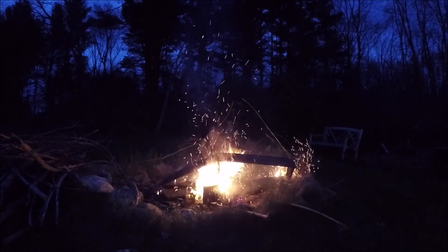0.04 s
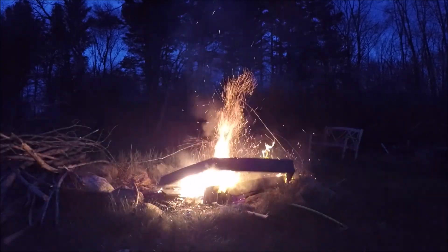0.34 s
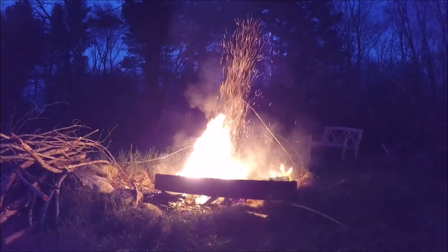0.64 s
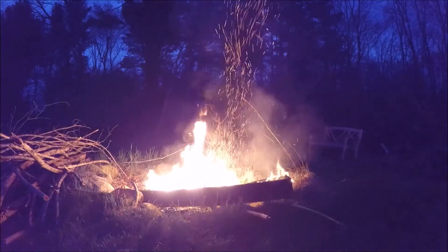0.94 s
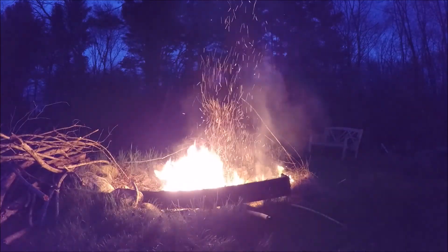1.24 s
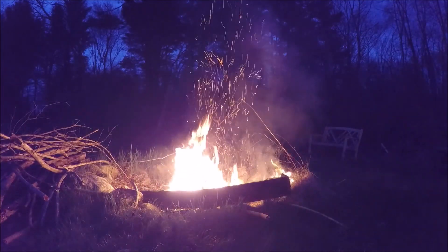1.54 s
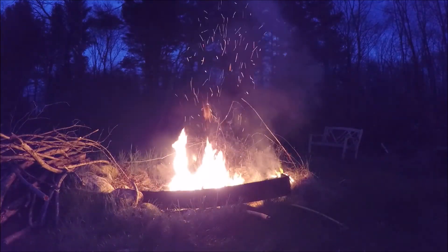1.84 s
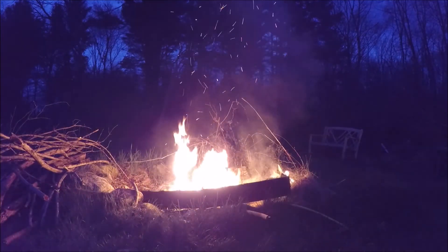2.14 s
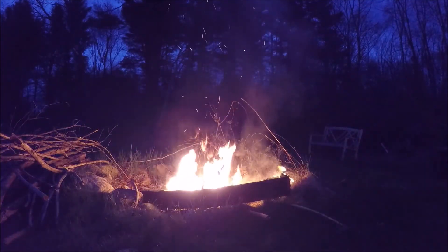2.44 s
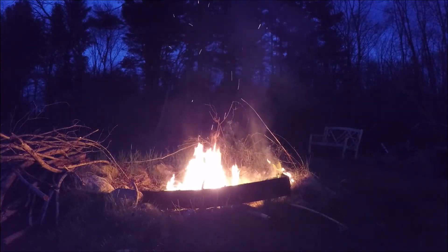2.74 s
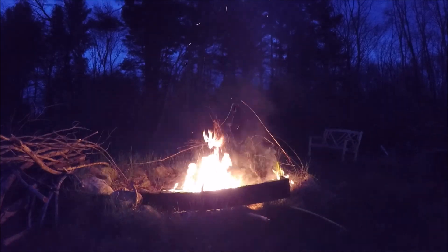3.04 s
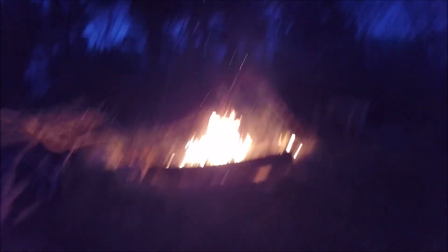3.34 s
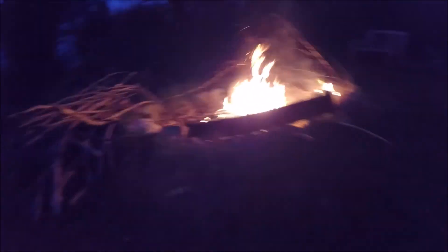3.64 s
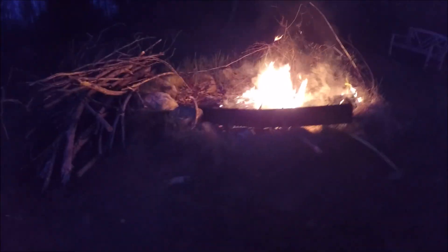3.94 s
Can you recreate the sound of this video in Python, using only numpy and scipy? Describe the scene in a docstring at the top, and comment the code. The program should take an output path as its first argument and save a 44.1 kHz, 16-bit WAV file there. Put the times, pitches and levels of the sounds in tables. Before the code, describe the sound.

A bonfire sizzles, snaps and pops as logs settle, then eases to a soft flutter. Small frogs peep faintly in the distant woods. Near the end, fingers knock and rub loudly on the hand-held microphone.

```python
"""Bonfire at dusk, frogs beyond

At the fireside, just after a log has been dropped on: stirred embers sizzle, wood snaps, pockets of
gas catch, and the flames throb, flutter and settle. Far off in the woods a chorus of small frogs peeps.
In the last second, right at the microphones, fingers knock and slide on the hand-held recorder."""
import sys
import numpy as np
from scipy import signal
from scipy.fft import rfft, irfft
from scipy.io import wavfile
from scipy.ndimage import uniform_filter1d, map_coordinates

SR = 44100
rng = np.random.default_rng(int(sys.argv[2]) if len(sys.argv) > 2 else 0)


def wav_out(sig):
    """Save sig, one row per channel (or a flat mono array), as 16-bit PCM at SR to the path in sys.argv[1]."""
    wavfile.write(sys.argv[1], SR, np.round(np.clip(np.atleast_2d(sig).T, -1, 1) * 32767).astype(np.int16))


N = 176400
T = np.arange(N) / SR
EMBERS_PER_S, EMBER_SPREAD_DB, EMBER_SIDE_DB = 2200, 2, -8.5
SOFT_RISE_S = 0.0027
# spectrum of a dry tick, in wood or on the recorder's case (frequency [Hz], level [dB])
DRY_TICK_SPECTRUM = [(300, -12), (900, 3), (2200, 7), (4500, 1), (8000, -18)]


def undb(db):
    """Decibels to gain."""
    return 10 ** (np.asarray(db) / 20)


def unit(x):
    """Scale to rms 1."""
    return x / np.sqrt(np.mean(x ** 2))


def curve(rows):
    """Gain through points of (time [s], level [dB])."""
    return undb(np.interp(T, *np.array(rows).T))


def colour(x, points):
    """Filter x by points of (frequency [Hz], level [dB]), rolling off beyond them; rms 1."""
    hz, db = np.array(points).T
    log_f = np.log(np.maximum(np.arange(N // 2 + 1) * SR / N, 1))
    outside = np.maximum(np.log(hz[0]) - log_f, 0) + np.maximum(log_f - np.log(hz[-1]), 0)
    gain = undb(np.interp(log_f, np.log(hz), db) - 20 * outside)
    return unit(irfft(rfft(x) * gain, N))


def noise():
    """White noise."""
    return rng.standard_normal(N)


def walk(per_s):
    """Smooth random wander, rms 1."""
    hold = int(SR / per_s)
    steps = np.repeat(noise()[:N // hold + 1], hold)
    return unit(uniform_filter1d(uniform_filter1d(steps, hold), hold)[:N])


def crackle(per_s, spread_db, spectrum):
    """Two unrelated streams of tiny filtered impulses; spread_db makes their sizes uneven."""
    streams = []
    for _ in range(2):
        size = undb(spread_db * np.minimum(rng.exponential(size=N), 5))
        impulses = (rng.random(N) < per_s / SR) * size * np.sign(noise())
        streams.append(colour(impulses, spectrum))
    return np.array(streams)


def noise_pair(spectrum):
    """Two unrelated noises of one spectrum."""
    return np.array([colour(noise(), spectrum) for _ in range(2)])


def wide(pair, side_db):
    """Left and right from a mid and side pair."""
    mid, side = pair
    return mid + undb(side_db) * side * np.array([[1], [-1]])


def pan(db):
    """Gains of constant total power, left over right by db."""
    return unit(undb(np.array([[db], [-db]]) / 2))


def burst(at, rise, fade):
    """A quick rise and an exponential fade."""
    return np.clip((T - at) / rise + 1, 0, 1) * np.exp(-np.maximum(T - at, 0) / fade)


def bump(at, half):
    """A smooth swell around one moment."""
    return np.exp(-((T - at) / half) ** 2)


def push_pull(at, half):
    """One smooth push followed by a pull, peak 1."""
    u = (T - at) / half
    return -np.sqrt(2 * np.e) * u * np.exp(-u ** 2)


def flames():
    """Turbulent burning: a flutter of tiny ignitions, nearly centred between the microphones."""
    # roar of the flames (time [s], level [dB])
    levels = [(0, -39), (.17, -34.5), (.35, -38), (.55, -38.5), (.82, -41), (1.1, -39), (1.24, -39),
              (1.32, -39), (1.45, -37), (1.65, -42.5), (1.87, -36.5), (1.97, -41), (2.2, -44.5),
              (2.47, -43.5), (2.77, -47), (2.87, -42.5), (4, -49)]
    # its spectrum (frequency [Hz], level [dB])
    spectrum = [(20, -36), (60, -13), (105, -9), (135, -0.5), (175, 1.5), (300, -7), (420, -4.5), (820, -8),
                (1150, -16), (2000, -28), (3000, -39), (4500, -54), (9000, -71)]
    ignitions = crackle(per_s=1500, spread_db=0, spectrum=spectrum)
    flutter = undb(1.5 * walk(44.8))
    return wide(ignitions, side_db=-18.5) * curve(levels) * flutter


def throbs(pitch_hz=68.6, waver=0.064, fall_over_rise=1.65):
    """In short spells the flame pulsates at a low, wavering pitch, a little to the left."""
    # spells of throbbing (peak time [s], rise [s], level [dB])
    spells = [(.005, 0.028, -27.5), (0.111, 0.022, -35), (0.211, 0.015, -27), (.324, 0.031, -33),
              (0.605, .028, -29), (0.695, 0.014, -26.5), (0.764, 0.024, -37.5), (.926, 0.028, -21.5),
              (1.048, 0.032, -21), (1.109, 0.026, -30)]
    cycles = np.cumsum(pitch_hz * (1 + waver * walk(38.96))) / SR
    pulsing = 0
    for at, rise, db in spells:
        swell = bump(at, np.where(T < at, rise, fall_over_rise * rise))
        pulsing += undb(db) * swell * np.cos(2 * np.pi * (cycles - np.interp(at, T, cycles)))
    roughness = undb(2.9 * walk(60.7))
    return np.sqrt(2) * pulsing * roughness * pan(3.5)


def draught():
    """The fire's draught rumbles and dies down."""
    # rumble of the draught (time [s], level [dB])
    levels = [(0, -40.5), (.25, -44), (.48, -42.5), (.75, -44.5), (1.1, -44), (1.4, -45), (1.8, -50.5),
              (2.2, -56.5), (2.8, -55.5), (4, -74)]
    # its spectrum (frequency [Hz], level [dB])
    spectrum = [(18, -6), (35, -5), (52, 7.5), (68, 0), (85, 3.5), (105, -1), (140, -14.5), (185, -15),
                (250, 1.5), (400, -54)]
    return wide(noise_pair(spectrum), side_db=-6.5) * curve(levels)


def embers():
    """Stirred embers give a fine crackle in quick clusters that dies away."""
    # sizzle of the embers (time [s], level [dB])
    levels = [(0, -44), (.15, -50), (.21, -50), (.27, -50.5), (.41, -52.5), (.49, -54), (.53, -50.5),
              (.59, -51), (.635, -49.5), (.67, -52.5), (.75, -55), (.8, -60), (.87, -54), (.9, -54),
              (.93, -52), (1, -62.5), (1.25, -70), (4, -73)]
    # its spectrum (frequency [Hz], level [dB])
    spectrum = [(800, 13), (2200, 1), (3200, 0), (4400, -6), (5400, -1), (6800, 3), (8200, -7),
                (9300, -10.5), (11000, -20.5), (15000, -29)]
    sizzle = wide(crackle(EMBERS_PER_S, EMBER_SPREAD_DB, spectrum), EMBER_SIDE_DB)
    clusters = undb(walk(90))
    return sizzle * curve(levels) * clusters


def frogs(pitch_hz=3576, spread_hz=115, rise_hz=128.3, peep_s=0.1124, peeps_per_s=70, echo_s=0.042):
    """Distant rising peeps, smeared by the woods, over the blur of the farthest callers."""
    # the chorus at the microphones (time [s], level [dB])
    levels = [(0, -55), (.8, -55), (1.15, -55), (1.6, -55.5), (1.8, -52.5), (2.1, -56.5), (2.3, -53),
              (2.7, -56), (3.1, -55), (4, -54)]
    # spectrum of the farthest frogs (frequency [Hz], level [dB])
    far_spectrum = [(2700, -47), (3050, -24.5), (3280, -8.5), (3580, -5.5), (3760, -10), (3900, -16),
                    (4050, -18), (4400, -40.5)]
    calls = np.zeros(2 * N)
    u = np.linspace(0, 1, int(peep_s * SR))
    echoes = [noise() * np.exp(-T / echo_s) for _ in range(2)]
    farthest = undb(-0.5) * noise_pair(far_spectrum)
    for k, (late, pitch, db) in enumerate(rng.standard_normal((int(peeps_per_s * N / SR), 3))):
        hz = pitch_hz + spread_hz * pitch + rise_hz * (u - .5)
        i = int((k + late) / peeps_per_s * SR) % N
        calls[i:i + len(u)] += undb(db) * np.sin(np.pi * u) * np.sin(2 * np.pi * np.cumsum(hz) / SR)
    call_spectrum = rfft(calls[:N] + calls[N:])
    smeared = [unit(irfft(call_spectrum * rfft(echo), N)) for echo in echoes]
    chorus = [unit(peeps + blur) for peeps, blur in zip(smeared, farthest)]
    return wide(chorus, side_db=-10.5) * curve(levels)


def air(hiss_db=-55, whine_db=-88, whine_hz=15640):
    """Faint steady hiss, unrelated left and right, and a thin high whine."""
    # spectrum of the hiss (frequency [Hz], level [dB])
    spectrum = [(20, -5), (150, 7), (1000, 21), (2500, 7), (4600, -1.5), (7000, -0.5),
                (10000, -1.5), (12000, -9), (15000, -14)]
    whine = np.sqrt(2) * np.sin(2 * np.pi * whine_hz * T)
    return undb(hiss_db) * noise_pair(spectrum) + undb(whine_db) * whine


def snaps(rise_s=.0008, tail_s=0.036, tail_db=-25):
    """Wood fibres break: a bright tick and a woody body, each with a faint tail."""
    # snaps in the fire (time [s], tick level [dB], body level [dB], fade [s])
    breaks = [(0.053, -46, -58, .003), (.117, -45, -55, .004), (0.128, -47, -46, 0.0022),
              (.148, -47, -46, .002), (0.236, -56, -49, 0.005), (0.263, -44.5, -55, 0.0024),
              (0.443, -50, -50, .006), (0.507, -39, -60, 0.0011), (0.5106, -41, -34, 0.0021),
              (0.533, -45, -65, .003), (0.634, -50, -41.5, 0.0046), (0.723, -40.5, -58, .002),
              (0.754, -49, -60, 0.0046), (0.879, -51, -50, 0.0045), (.936, -49, -43, 0.0019),
              (1.707, -53.5, -70, .002)]
    # spectrum of the bright tick (frequency [Hz], level [dB])
    tick_spectrum = [(2000, -23), (4500, -4), (5700, 9.5), (7500, 7), (10000, -10), (15000, -26)]
    tick, body = 0, 0
    for at, tick_db, body_db, fade in breaks:
        shape = burst(at, rise_s, fade) + undb(tail_db) * burst(at, rise_s, tail_s)
        tick += undb(tick_db) * shape
        body += undb(body_db) * shape
    bright = wide(noise_pair(tick_spectrum), EMBER_SIDE_DB)
    return tick * bright + body * colour(noise(), DRY_TICK_SPECTRUM)


def puffs(pop_s=0.00053):
    """Pockets of gas catch light: a dull pressure pop and a short rush."""
    # gas pockets (time [s], rush level [dB], fade [s], pop peak [dB])
    pockets = [(0.149, -34, 0.047, -21), (0.184, -42, 0.012, -29), (0.212, -53, 0.024, -32),
               (0.464, -37.5, 0.01, -26), (0.916, -31.5, 0.02, -27), (.937, -35, 0.0092, -15),
               (0.988, -43, 0.0079, -48), (1.204, -31.5, 0.051, -38), (1.247, -28, 0.0035, -49),
               (1.395, -33.5, 0.018, -21.5), (1.502, -37, .012, -33), (1.585, -47, 0.0067, -51),
               (1.749, -29.5, 0.0053, -42), (1.789, -43, 0.0055, -48), (1.842, -31, 0.031, -22.5),
               (1.865, -34, 0.018, -35), (1.997, -33.5, 0.018, -34), (2.104, -31, 0.009, -33),
               (2.227, -47, 0.0057, -51), (2.286, -37, 0.015, -32), (2.293, -45, 0.014, -26),
               (2.399, -41, 0.021, -42)]
    # spectrum of the rush (frequency [Hz], level [dB])
    spectrum = [(30, -21), (100, 15), (190, -3), (400, 9.5), (800, -1), (1200, -9.5), (2000, -26.5),
                (4500, -41)]
    rush, pops = 0, 0
    for at, rush_db, fade, pop_db in pockets:
        rush += undb(rush_db) * burst(at, SOFT_RISE_S, fade)
        rebound = bump(at + 5.1 * pop_s, 2 * pop_s) / 2
        pops += undb(pop_db) * (rebound - bump(at, pop_s))
    return rush * colour(noise(), spectrum) + pops


def logs(fade_s=0.035):
    """Logs settle in the pile with a short hollow ring."""
    # thumps of the logs (time [s], level [dB], ring [Hz])
    thumps = [(0.151, -26, 180), (.455, -35.5, 197), (1.398, -32, 208)]
    return sum(undb(db) * burst(at, SOFT_RISE_S, fade_s) * np.cos(2 * np.pi * hz * (T - at))
               for at, db, hz in thumps)


def sparks():
    """Showers of sparks: clumps of crackle, brighter than the embers."""
    # spark showers (time [s], half length [s], level [dB])
    showers = [(0.526, 0.036, -56), (0.628, 0.01, -57), (0.753, 0.013, -52)]
    # their spectrum (frequency [Hz], level [dB])
    spectrum = [(4500, -20), (6500, 1), (8900, 4), (11000, -14), (15000, -26)]
    fizz = wide(crackle(EMBERS_PER_S, EMBER_SPREAD_DB, spectrum), EMBER_SIDE_DB)
    return fizz * sum(undb(db) * bump(at, half) for at, half, db in showers)


def grip(lurch_s=0.011):
    """Handling rumble: the recorder's case shifts and lurches in the hand."""
    # sway of the case (time [s], level [dB])
    levels = [(2.95, -93), (3.0, -50), (3.24, -40), (3.27, -32), (3.44, -29), (3.5, -31), (3.57, -27),
              (3.7, -39.5), (3.82, -27), (4, -30.5)]
    # its spectrum (frequency [Hz], level [dB])
    spectrum = [(12, -1), (28, -4), (55, 3.5), (90, 0), (160, -25), (500, -43)]
    # deep lurches (time [s], peak [dB])
    lurches = [(3.274, -22), (3.433, -24), (3.556, -25), (3.595, -30), (3.815, -28.5)]
    sway = wide(noise_pair(spectrum), side_db=-1) * curve(levels)
    return sway + sum(undb(db) * push_pull(at, lurch_s) for at, db in lurches)


def knocks(thud_hz=156.4, thud_late_s=0.00285, left_lead_s=.0002, tick_s=0.00027):
    """Fingers land: a soft thud, a dry tick and a dull click driving the microphones oppositely."""
    # knocks on the case (time [s], thud level [dB], fade [s], click level [dB], contact time [s])
    landings = [(2.982, -5, 0.0073, -1, 0.00055), (3.467, -19, 0.0041, -9.5, 0.0012),
                (3.618, -15.5, 0.0024, -20, 0.0015), (3.653, -27.5, 0.0021, -17, .0012),
                (3.834, -32, 0.0023, -15, .001), (3.8443, -18.5, 0.0069, -32, .0014),
                (3.893, -19, 0.0078, -19, 0.0017), (3.907, -15.5, 0.0034, -20, 0.00098)]
    touch = colour(noise(), DRY_TICK_SPECTRUM)
    out = 0
    for at, thud_db, fade, click_db, contact in landings:
        shape = np.exp(-np.abs(T - at - thud_late_s) / fade)
        thud = -undb(thud_db) * shape * np.cos(2 * np.pi * thud_hz * (T - at))
        click = np.array([-push_pull(at - left_lead_s, contact), push_pull(at, contact)])
        tick = undb(-17 + 2 * click_db) * bump(at, tick_s) * touch  # only hard knocks tick audibly
        out += thud * pan(-27) + undb(click_db) * (click + tick) * pan(-6.5)
    return out


def rubs(slips_per_s=3200, spread_db=1.5, left_lag_s=.00007, common_db=-13.5):
    """Skin sticks and slips on the case, whose hollow body drives the microphone ports oppositely."""
    # finger slides (start [s], end [s], rise [s], fall [s], hiss [dB], rasp [dB], body [dB],
    # rumble [dB], hiss left over right [dB])
    slides = [(3.006, 3.157, 0.036, 0.082, -37.5, -43.5, -29.5, -29, -15),
              (3.091, 3.255, 0.12, 0.021, -40, -45.5, -29.5, -34, -9),
              (3.242, 3.299, 0.03, 0.01, -52.5, -44, -37.5, -33, -5),
              (3.298, 3.43, 0.071, 0.038, -39.5, -38.5, -25, -27, -12),
              (3.375, 3.66, 0.018, 0.0099, -69, -80, -44.5, -37.5, -4),
              (3.535, 3.579, 0.016, 0.024, -47.5, -42, -32.5, -32.5, -16),
              (3.604, 3.79, 0.021, 0.071, -55.5, -56.5, -38, -30.5, -22),
              (3.736, 3.957, 0.099, 0.11, -49.5, -37, -28.5, -27, -15),
              (3.863, 4.1, 0.093, .05, -63, -51, -38, -30, -10)]
    # hiss of the skin (frequency [Hz], level [dB])
    hiss_spectrum = [(2500, -2), (4500, -3.5), (5400, -3), (6300, 1.5), (7300, -1), (8500, -9),
                     (10000, -13.5), (13000, -27), (15000, -45)]
    # rasp of the skin (frequency [Hz], level [dB])
    rasp_spectrum = [(800, -4), (1400, -5), (1700, 5), (1950, -1), (2350, 5.5), (2900, 11.5), (3800, -5),
                     (5000, -33), (8000, -41)]
    # hollow body of the case (frequency [Hz], level [dB])
    body_spectrum = [(200, -4), (400, -6.5), (650, -2.5), (900, -4.5), (1150, -11.5), (1500, -10),
                     (2100, -22.5), (3500, -27.5)]
    # low rumble of the case (frequency [Hz], level [dB])
    rumble_spectrum = [(20, -17), (70, -5.5), (110, -8.5), (165, 2), (260, -3.5), (380, -5), (600, -18.5),
                       (1500, -73)]
    hiss = crackle(slips_per_s, spread_db, hiss_spectrum)
    rasp = crackle(slips_per_s, spread_db, rasp_spectrum)
    opposed, common = crackle(slips_per_s, spread_db, body_spectrum)
    rumble = crackle(slips_per_s, spread_db, rumble_spectrum) * pan(-15.5)
    body = np.array([-np.interp(T - left_lag_s, T, opposed), opposed])
    body = (body + undb(common_db) * common) * pan(-0.5)
    # the rasp's pitch drifts as the finger moves, and is lower at the right port
    glide = np.cumsum(1 + .05 * walk(15))
    rasp = np.array([map_coordinates(port, [glide * ratio], mode="mirror")
                     for port, ratio in zip(rasp, (1, .8))]) * pan(11)
    out = 0
    for start, end, rise, fall, hiss_db, rasp_db, body_db, rumble_db, pan_db in slides:
        speed = np.clip((T - start) / rise, 0, 1) * np.clip((end - T) / fall, 0, 1)
        skin = undb(hiss_db) * pan(pan_db) * hiss + undb(rasp_db) * rasp
        case = undb(body_db) * body + undb(rumble_db) * rumble
        out += speed * (skin + case)
    judder = undb(walk(220))
    return out * judder


def scene():
    """The fire in front, frogs far off and the hand on the recorder."""
    fire = flames() + throbs() + draught() + embers() + snaps() + puffs() + logs() + sparks()
    return fire + frogs() + air() + grip() + knocks() + rubs()


def record(dry, ceiling=.46, release_s=.06, look_ahead_s=0.00096, top_hz=15800):
    """The recorder's limiter ducks at the hardest knock, and its filter cuts the top."""
    over = np.log(np.maximum(np.abs(dry).max(axis=0) / ceiling, 1))
    held = np.maximum.accumulate(over + T / release_s) - T / release_s
    early = np.interp(T + look_ahead_s, T, held)
    bell = np.exp(-(np.arange(-128, 129) / SR / look_ahead_s) ** 2)  # rounds off the gain changes
    duck = np.convolve(early, bell / bell.sum(), "same")
    lowpass = signal.ellip(8, .2, 70, top_hz, fs=SR, output="sos")
    return signal.sosfilt(lowpass, dry * np.exp(-duck))


dry = scene()
out = record(dry)
wav_out(out)
```